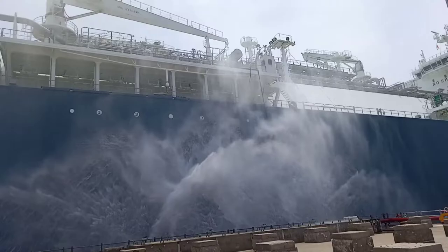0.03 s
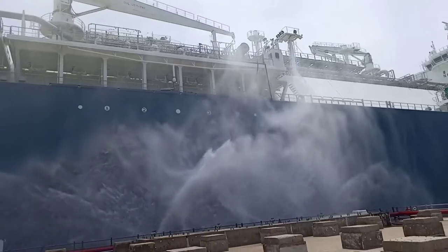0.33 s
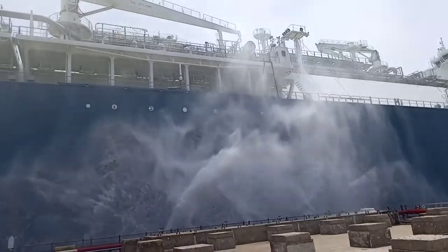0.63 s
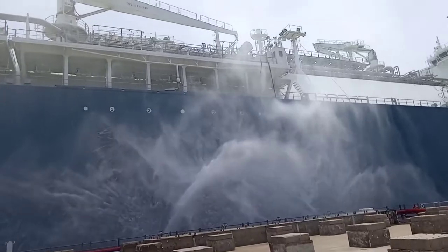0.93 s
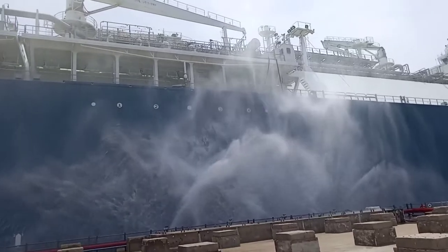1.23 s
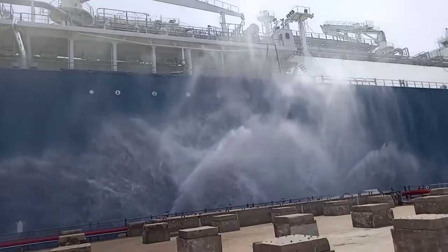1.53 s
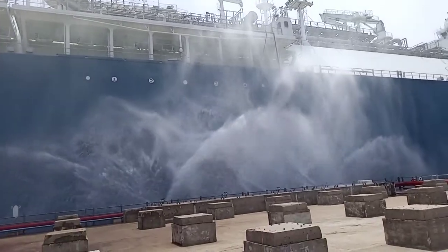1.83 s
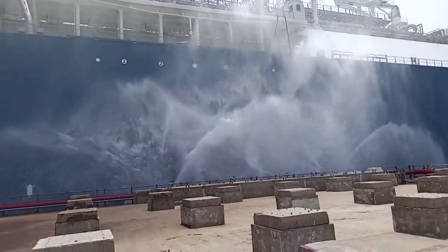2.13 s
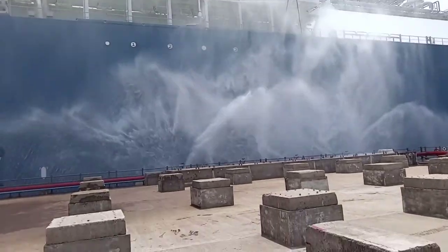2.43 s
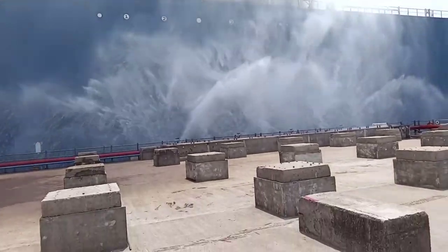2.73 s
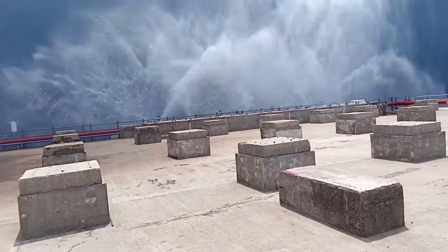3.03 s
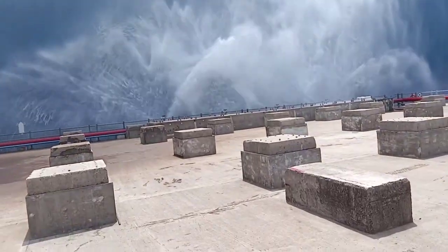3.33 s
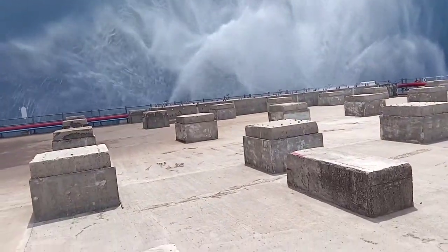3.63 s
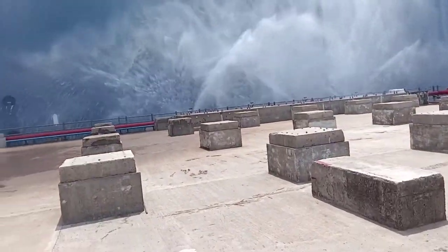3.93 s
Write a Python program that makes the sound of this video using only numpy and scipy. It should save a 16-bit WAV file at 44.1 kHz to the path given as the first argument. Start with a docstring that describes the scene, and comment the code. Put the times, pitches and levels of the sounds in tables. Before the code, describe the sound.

Water jets spray and roar against a ship's hull over a low pump engine drone.

```python
"""Water jets beside a ship's hull

Heard from the dock: jets spray without a break while a pump engine drones at its firing rate.
The falling water roars, with drops and heavier splashes; its hiss changes colour as the spray
shifts and the microphone turns. One dull knock comes near the end. Mono, fading in from silence."""
import sys
import numpy as np
from scipy import signal
from scipy.fft import rfft, irfft
from scipy.io import wavfile
from scipy.ndimage import uniform_filter1d, map_coordinates

SR = 44100
rng = np.random.default_rng(int(sys.argv[2]) if len(sys.argv) > 2 else 0)


def wrap_up_sound(samples):
    """Save the sound to the file named by the first command line argument, as 16-bit audio."""
    columns = np.atleast_2d(samples).T
    # keep every value between -1 and 1, then stretch to whole-number steps
    tamed = np.clip(columns, -1, 1)
    steps = np.round(tamed * 32767).astype(np.int16)
    wavfile.write(sys.argv[1], SR, steps)


N = 176400


def amp(db):
    """Decibels to gain."""
    return 10 ** (np.asarray(db) / 20)


def unit_rms(x):
    """x scaled to rms 1."""
    return x / np.sqrt(np.mean(x ** 2) + 1e-20)


def time_s():
    """Time of each sample."""
    return np.arange(N) / SR


def curve(rows):
    """Straight lines through rows of time_s, value."""
    return np.interp(time_s(), *np.transpose(rows))


def wobble(knots_per_s):
    """Smooth random curve."""
    return map_coordinates(rng.standard_normal(1024), [time_s() * knots_per_s + 2], mode="wrap")


def coloured(x, spectrum):
    """x shaped by rows of freq_hz, gain_db on a log frequency axis, at rms 1."""
    freq_hz, gain_db = np.transpose(spectrum)
    bin_hz = np.fft.rfftfreq(N, 1 / SR)
    gain = amp(np.interp(np.log(bin_hz + 1), np.log(freq_hz), gain_db))
    return unit_rms(irfft(rfft(x) * gain, N))


def patches(x, depth_db, window_samples):
    """x under a random time-frequency gain; a longer window gives narrower, longer patches."""
    spectrogram = signal.stft(x, nperseg=window_samples)[2]
    field = uniform_filter1d(rng.standard_normal(spectrogram.shape), size=5, axis=0)
    field = uniform_filter1d(field, size=9, axis=1)
    return signal.istft(spectrogram * amp(depth_db * unit_rms(field)), nperseg=window_samples)[1][:N]


def rush(spectrum, patchy_db):
    """Rushing water: coloured noise with brief broad patches and longer narrow ones."""
    noise = patches(rng.standard_normal(N), patchy_db, window_samples=512)
    noise = patches(noise, depth_db=1.66, window_samples=2048)
    return coloured(noise, spectrum)


def pump():
    """Engine drone: five slightly unsteady harmonics of the firing rate."""
    # fundamental and octave envelopes: time_s, level_db
    fundamental = [(.4, -36), (.7, -36.5), (1.05, -33.5), (1.6, -34.5), (2.2, -39), (2.55, -55),
                   (2.85, -48.5), (3.2, -40.5), (3.55, -36), (3.95, -33.5)]
    octave = [(.4, -35.5), (.8, -36), (1.1, -41), (1.5, -40), (1.75, -35.5), (2.05, -38.5), (2.5, -37.5),
              (3.0, -36), (3.2, -41.5), (3.5, -36), (3.95, -41)]
    # weaker overtones: harmonic, level_db
    overtones = [(3, -46), (4, -61), (5, -61.5)]
    firing_hz, drift_ratio = 76.22, 0.00415
    phase = 2 * np.pi * np.cumsum(firing_hz * (1 + drift_ratio * wobble(5.08))) / SR
    out = np.zeros(N)
    for harmonic, level_db in [(1, curve(fundamental)), (2, curve(octave))] + overtones:
        peak = np.sqrt(2) * amp(level_db + 0.97 * wobble(12))
        out += peak * np.sin(harmonic * phase + rng.uniform(0, 2 * np.pi))
    return out


def roar():
    """The mass of water coming down, with two deep surges."""
    # steady roar and surge spectra: freq_hz, gain_db
    roar_spectrum = [(20, -28), (36, -21), (56, -2.5), (105, -0.5), (135, 0.5), (200, 1), (300, -2.5),
                     (420, -3.5), (560, -4.5), (720, -3.5), (950, -7.5), (1300, -7), (1800, -6.5),
                     (2600, -10), (4200, -17), (15000, -30)]
    surge_spectrum = [(25, -25), (50, -7), (90, 6), (130, -8), (300, -43)]
    # low surges: centre_s, half_width_s, level_db
    surges = [(2.778, 0.046, -37), (3.62, 0.045, -34)]
    steady = amp(-32 + 0.55 * wobble(14)) * rush(roar_spectrum, patchy_db=1.33)
    swell = sum(amp(level_db) * np.exp(-((time_s() - centre_s) / half_width_s) ** 2)
                for centre_s, half_width_s, level_db in surges)
    return steady + swell * coloured(rng.standard_normal(N), surge_spectrum)


def spray():
    """Shifting spray: bands of hiss swell in turn and share a slight flutter."""
    # band envelopes: time_s, level_db
    wash = [(.4, -39), (1.1, -41), (2.2, -41.5), (2.9, -40.5), (3.38, -40.5), (3.49, -33), (3.7, -35.5),
            (3.98, -36)]  # 2-3 kHz
    body = [(.4, -37.5), (.9, -38), (1.4, -35), (2.3, -35.5), (2.85, -36.5), (3.15, -34), (3.4, -33),
            (3.55, -31.5), (3.8, -30), (3.95, -37)]  # 2.5-4 kHz
    hiss = [(.4, -41.5), (1.03, -40), (1.25, -32), (1.45, -31.5), (1.63, -31), (1.76, -36), (2.4, -35.5),
            (2.72, -35.5), (2.82, -40), (3.07, -42.5), (3.3, -37), (3.52, -33), (3.82, -35.5), (3.91, -43)]  # 4-6 kHz
    sizzle = [(0.4, -46.5), (0.95, -48.5), (1.27, -42.5), (2.2, -44), (2.62, -41.5), (2.96, -43.5),
              (3.77, -39.5), (3.98, -42)]  # 6-7.5 kHz
    fizz = [(.4, -45), (1.08, -46), (1.25, -42), (1.5, -41), (1.7, -44.5), (2.3, -43), (2.85, -40.5),
            (3.3, -44), (3.5, -55), (3.8, -52), (3.98, -47)]  # 7.5-10.5 kHz
    sheen = [(.4, -54), (1.05, -51), (1.45, -45.5), (1.85, -50.5), (2.6, -46.5), (3.0, -53), (3.3, -44),
             (3.5, -49.5), (3.98, -50)]  # near 11 kHz
    air = [(0.4, -52), (1.04, -51), (1.06, -54.5), (1.26, -45), (1.57, -45), (1.79, -48), (2.81, -39.5),
           (2.91, -37.5), (3.41, -45), (3.48, -60), (3.98, -49)]  # above 12 kHz
    whistle = [(.4, -55), (1.9, -53), (2.7, -48), (2.95, -44), (3.25, -46), (3.45, -59)]  # narrow resonance near 8 kHz
    # band spectra: freq_hz, gain_db
    wash_spectrum = [(1000, -28), (1600, -7), (2100, -1), (2400, 1), (2750, 0), (3500, -26)]
    body_spectrum = [(1800, -22), (2600, -7), (3150, -0.5), (3450, -1.5), (4000, -2.5), (4450, -14),
                     (5500, -45)]
    hiss_spectrum = [(3500, -16), (4300, -1.5), (4800, -1.5), (5400, -1.5), (5900, -3.5), (6400, -20.5),
                     (7500, -54)]
    sizzle_spectrum = [(5300, -24), (6200, 5), (6900, 2.5), (7400, 4), (8000, -17), (9000, -40)]
    fizz_spectrum = [(6800, -41), (7600, -3.5), (8150, -2.5), (8700, -3.5), (9200, -5), (9650, -9),
                     (10300, -4.5), (11000, -16.5), (12500, -38)]
    sheen_spectrum = [(9500, -33), (10700, -3), (11350, 2), (11900, -4), (13000, -30)]
    air_spectrum = [(10800, -14), (12100, 0), (12800, -3), (13500, -2), (14200, -3), (15400, -6)]
    whistle_spectrum = [(7200, -45), (7750, -6), (8080, 16), (8450, -6), (9100, -30), (12500, -30),
                        (13200, -9), (13500, -5), (13900, -11), (15400, -21)]
    bands = [(wash, wash_spectrum), (body, body_spectrum), (hiss, hiss_spectrum),
             (sizzle, sizzle_spectrum), (fizz, fizz_spectrum), (sheen, sheen_spectrum),
             (air, air_spectrum), (whistle, whistle_spectrum)]
    flutter = amp(0.3 * wobble(22.2))
    return flutter * sum(amp(curve(envelope)) * rush(spectrum, patchy_db=1.47)
                         for envelope, spectrum in bands)


def spatter():
    """Single drops slap down at random, each a filtered impulse."""
    # drop spectrum: freq_hz, gain_db
    drop_spectrum = [(250, -24), (600, -0.5), (3000, 1.5), (6000, -3), (15000, -7)]
    drops_per_s, rms_db, spread_db = 260, -47, 0.5
    hits = rng.random(N) < drops_per_s / SR
    strengths = rng.choice([-1, 1], N) * amp(spread_db * rng.standard_normal(N))
    return amp(rms_db) * coloured(hits * strengths, drop_spectrum)


def splashes():
    """Larger lumps of water land, each a short noise burst around its own centre frequency."""
    # landings: start_s, level_db, centre_hz
    landings = [(1.091, -35, 2400), (1.64, -31, 330), (1.78, -29, 330), (1.992, -28.5, 700),
                (2.08, -42, 620), (2.23, -29, 1800), (3.272, -26.5, 1490)]
    rise_s, t60_s = 0.0037, 0.15
    out = np.zeros(N)
    for start_s, level_db, centre_hz in landings:
        age_s = np.maximum(time_s() - start_s, 0)
        spectrum = [(centre_hz / 4, -22), (centre_hz / 2, -4), (centre_hz, 0),
                    (2 * centre_hz, -12), (4 * centre_hz, -28)]
        envelope = amp(level_db - 60 * age_s / t60_s) * (1 - np.exp(-age_s / rise_s))
        out += envelope * coloured(rng.standard_normal(N), spectrum)
    return out


def knock():
    """Something close by knocks and chatters: each contact cracks and rings the same modes."""
    # contacts: start_s, level_db
    contacts = [(3.8522, -15.5), (3.8555, -17), (3.8573, -18.5), (3.8618, -18.5)]
    # ringing modes: pitch_hz, gain_db, t60_s
    modes = [(504, -5.5, .05), (682, -3.5, 0.027), (903, -4.5, 0.024), (1090, -5, 0.02),
             (1780, -8.5, 0.021), (2200, -10, 0.018), (2670, -19, .015)]
    # contact noise spectrum: freq_hz, gain_db
    crack_spectrum = [(300, -14), (700, -7), (2000, -6), (3500, -9), (5000, -28), (8000, -60)]
    crack_gain_db, crack_t60_s = -6, 0.026
    passband_hz = [335, 4200]
    out = np.zeros(N)
    for start_s, level_db in contacts:
        age_s = np.maximum(time_s() - start_s, 0)
        ring = np.zeros(N)
        for pitch_hz, gain_db, t60_s in modes:
            decay = amp(gain_db + rng.normal(0, 1) - 60 * age_s / t60_s)
            ring += decay * np.sin(2 * np.pi * pitch_hz * age_s)
        crack_envelope = (age_s > 0) * amp(crack_gain_db - 60 * age_s / crack_t60_s)
        crack = crack_envelope * coloured(rng.standard_normal(N), crack_spectrum)
        out += amp(level_db) * (crack - ring)
    return signal.sosfilt(signal.butter(2, passband_hz, "band", fs=SR, output="sos"), out)


def scene():
    """All sources summed, alike in both channels."""
    mono = pump() + roar() + spray() + spatter() + splashes() + knock()
    return np.array([mono, mono])


def record(dry):
    """Brick-wall low-pass and fade-in."""
    cutoff_hz = 15520
    fade_start_s, fade_s, fade_power = 0.11, 0.32, 0.79
    fade = np.clip((time_s() - fade_start_s) / fade_s, 0, 1) ** fade_power
    passband = np.fft.rfftfreq(N, 1 / SR) < cutoff_hz
    return fade * irfft(rfft(dry) * passband, N)


dry = scene()
out = record(dry)
wrap_up_sound(out)
```